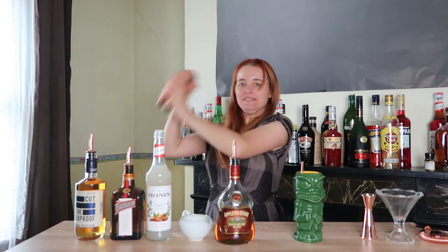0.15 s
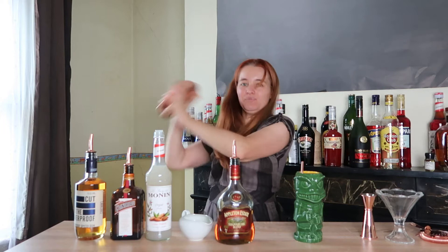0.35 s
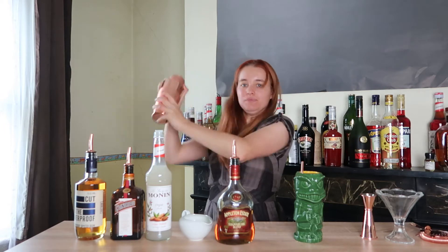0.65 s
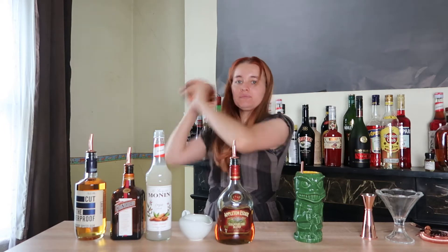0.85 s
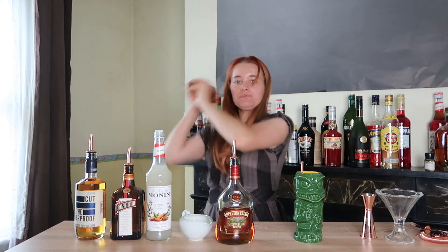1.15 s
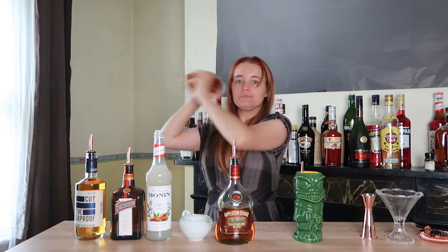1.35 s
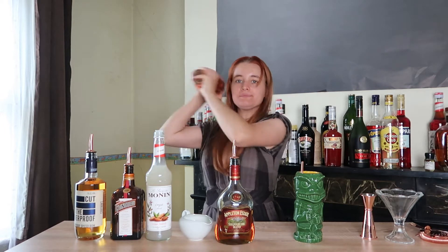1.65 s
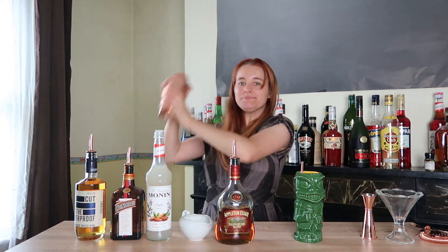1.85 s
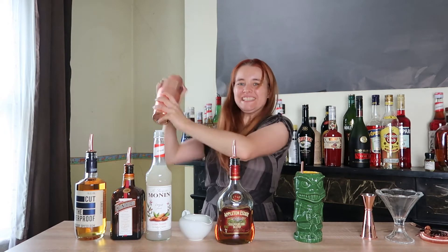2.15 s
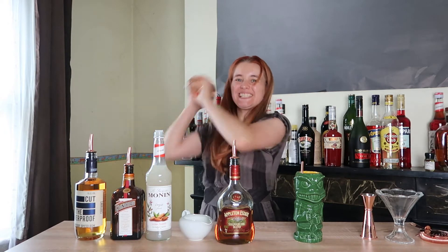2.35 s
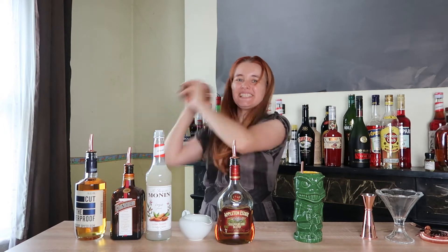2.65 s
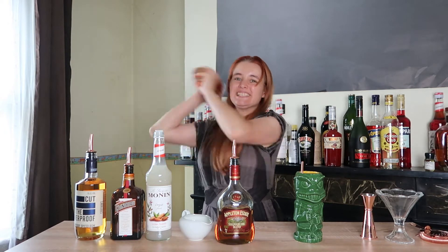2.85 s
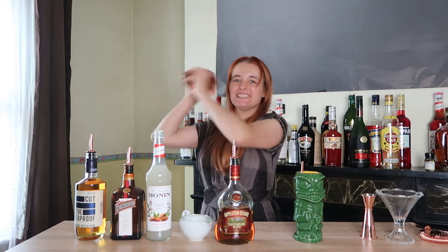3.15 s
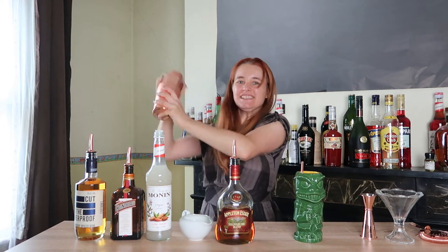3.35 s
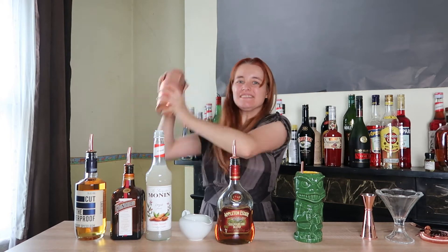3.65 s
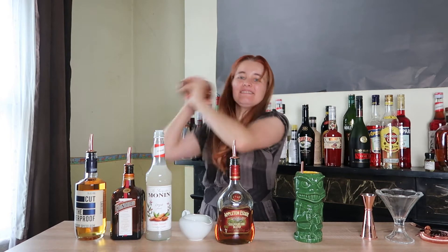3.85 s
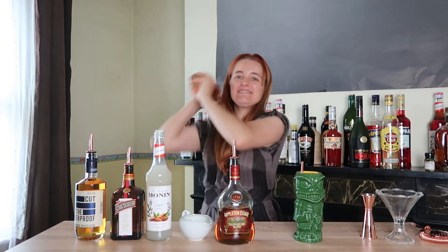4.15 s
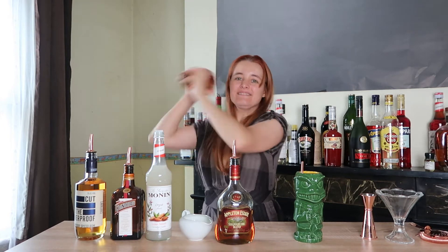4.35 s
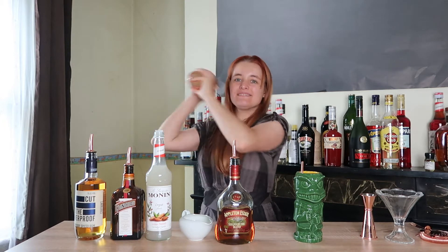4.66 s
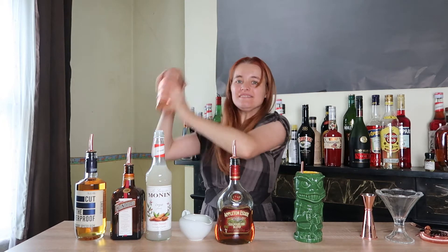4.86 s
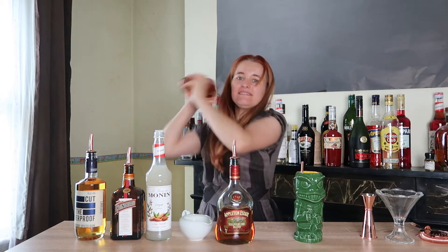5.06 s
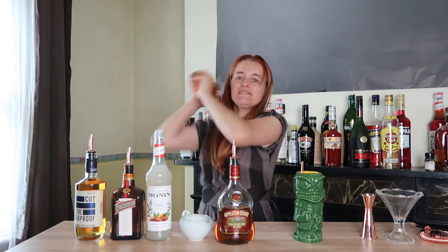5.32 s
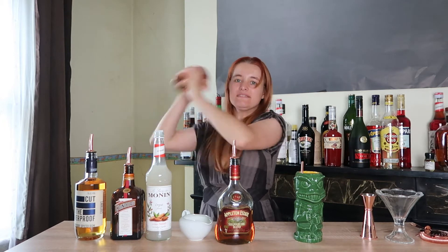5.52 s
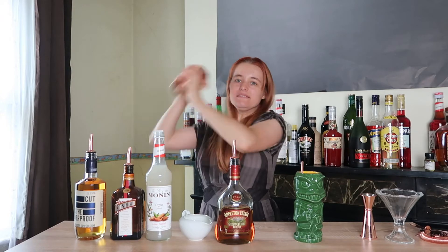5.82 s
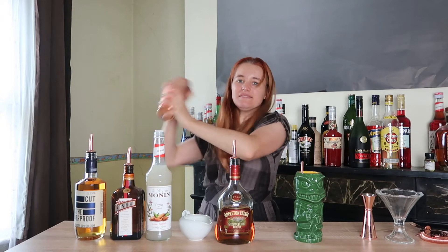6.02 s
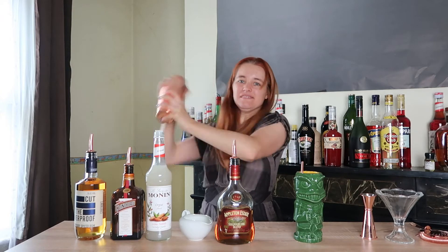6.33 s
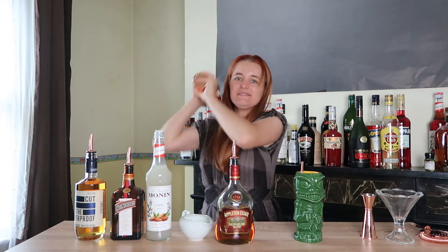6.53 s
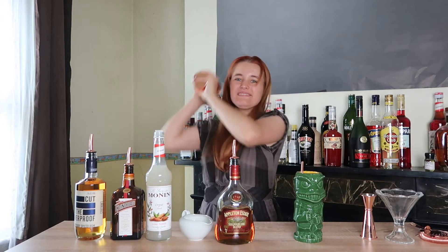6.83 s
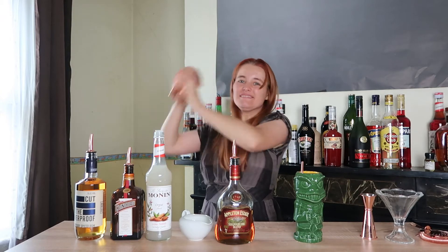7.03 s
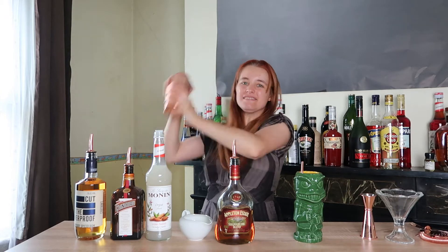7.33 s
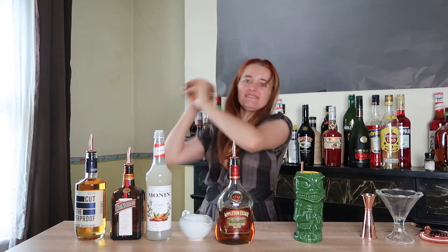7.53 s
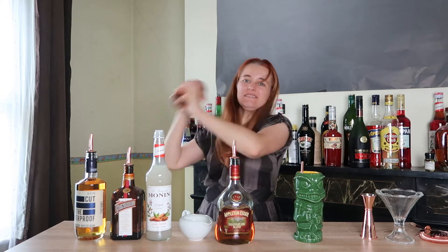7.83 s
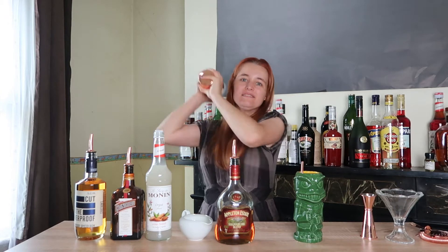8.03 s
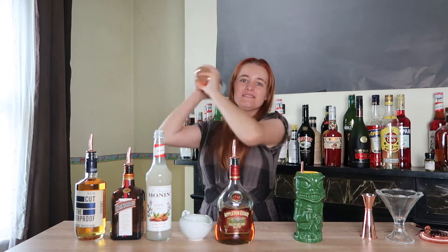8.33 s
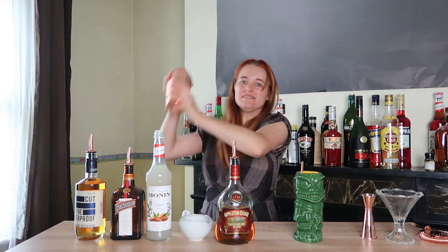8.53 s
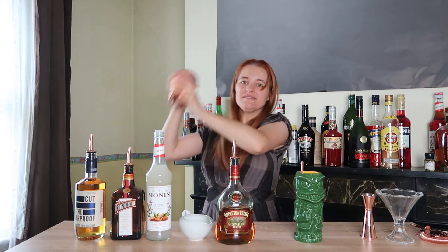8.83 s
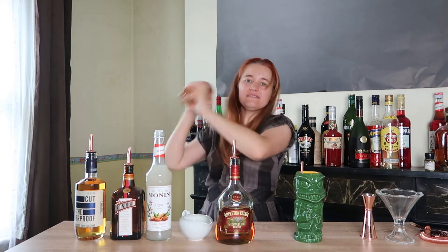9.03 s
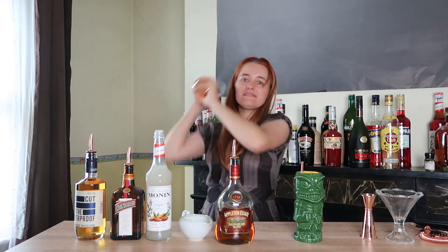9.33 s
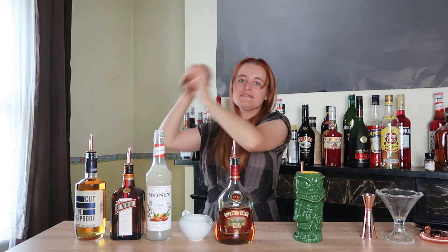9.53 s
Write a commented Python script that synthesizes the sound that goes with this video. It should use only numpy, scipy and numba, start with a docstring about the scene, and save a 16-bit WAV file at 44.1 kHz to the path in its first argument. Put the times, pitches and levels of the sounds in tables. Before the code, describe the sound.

Ice cubes rattle hard and nonstop inside a sealed metal shaker, about three quick strokes a second, in a small furnished room.

```python
"""Ice cubes are thrown up and down inside a sealed steel shaker, about three strokes a second, a few metres away.
Each knock is a sum of short decaying sines of wet, hand-damped steel and a few lasting tones of the tin;
large cubes thud lower, and hard blows crack. A small furnished room answers with decaying noise, over a
faint hum of filtered noise. The microphone pair hears the highest treble mostly in its side signal."""
import sys
import numpy as np
from scipy import signal
from scipy.fft import rfft, irfft
from scipy.io import wavfile
from scipy.ndimage import uniform_filter1d
from numba import njit

SR = 44100
rng = np.random.default_rng(int(sys.argv[2]) if len(sys.argv) > 2 else 0)


def transcribe(u):
    """Save the signal u as a 16-bit wav file named by the first command-line argument.

    u: samples, shape (n,) or (channels, n), limited to [-1, 1]; the rate is SR.
    q: integer samples, one column per channel.
    """
    v = np.clip(np.atleast_2d(u).T, -1, 1)
    q = np.round(v * 32767).astype(np.int16)
    wavfile.write(sys.argv[1], SR, q)


N = 426888
TOP_HZ = 15730  # highest partial, and the top of the recorder's range


def undb(db):
    """Turns decibels into an amplitude factor."""
    return 10 ** (np.asarray(db) / 20)


def level(x, db):
    """Scales a sound to an RMS level in dB."""
    return x * undb(db) / np.sqrt(np.mean(x ** 2))


def colour(x, points):
    """Shapes a sound by a spectrum of (frequency [Hz], gain [dB])."""
    hz, db = np.transpose(points)
    bins = np.arange(len(x) // 2 + 1) * SR / len(x) + 1
    gain = undb(np.interp(np.log(bins), np.log(hz), db))
    return irfft(rfft(x) * gain, len(x))


# spectrum of the hum at the centre of the pair: (frequency [Hz], relative density [dB])
HUM_SPECTRUM = [(25, -10), (49, 4.5), (70, -6), (100, 3.5), (125, -5), (170, 6), (200, -6.5), (238, 5),
                (280, -1.5)]
# loudness of the hum through the take: (time [s], level [dB])
HUM_SWELL_LEVELS = [(0, -54), (4.2, -53), (4.8, -58), (6.7, -54.5), (7.2, -54)]


def hum():
    """Low steady murmur of appliances; the deepest part is the same at both microphones."""
    centre = colour(rng.standard_normal(N), [(10, -40)] + HUM_SPECTRUM + [(3000, -22.5)])
    apart = colour(rng.standard_normal(N), [(20, -30), (130, -13), (250, -4), (600, -8), (3000, -27)])
    swell_db = np.interp(np.arange(N) / SR, *np.transpose(HUM_SWELL_LEVELS))
    return np.array([level(centre, 0), level(apart, -4.0)]) * undb(swell_db)


@njit
def ring(start, hz, t60, size, contact_s, length):
    """Sum of decaying sines, each set off at its own sample and swelling while the contact lasts."""
    swell = np.exp(-1 / (contact_s * SR))
    out = np.zeros(length)
    for k in range(len(start)):
        # turning by this factor each sample gives both pitch and decay
        turn = np.exp(2j * np.pi * hz[k] / SR - np.log(1000.) / (t60[k] * SR))
        z, rest = size[k] + 0j, 1.
        for i in range(start[k], min(length, start[k] + int(.7 * t60[k] * SR))):
            out[i] += z.imag * (1 - rest)
            rest *= swell
            z *= turn
    return out


def partials(s, db, hz, t60, spread_db=3, contact_s=0.0004):
    """Rings for knocks in rows and partials in columns; equal energy whatever the decay, random sign."""
    sign = np.sign(rng.standard_normal(hz.shape))
    size = undb(db + spread_db * rng.uniform(-1, 1, hz.shape)) * sign / np.sqrt(t60)
    sample = np.clip(s[:, None] * SR, 0, N - 1).astype(np.int64)
    start = np.broadcast_to(sample, hz.shape).ravel().copy()
    return ring(start, hz.ravel().copy(), t60.ravel().copy(), size.ravel(), max(contact_s, 1e-5), N)


def steel(s, db, heavy_db, count=10, t60=0.083, contact_s=0.00038):
    """Broad clatter: every knock wakes other partials of the wall; high ones die sooner."""
    place = rng.random((len(s), count))
    hz = 120 + (TOP_HZ - 120) * place ** 1.5
    # partials crowd in the bass, so each is weighted by the room it has
    crowding_db = 5 * np.log10(place + 0.01)
    # big cubes favour the lows
    lows = 1 / (1 + (hz / 1200) ** 4)
    # a harder knock is a shorter contact, so it is brighter; small cubes are brighter than big ones
    treble_db = 0.31 * (db - np.mean(db)) - 0.24 * (heavy_db - np.mean(heavy_db))
    bright_db = treble_db[:, None] / (1 + (6000 / hz) ** 2)
    partial_db = db[:, None] + bright_db + crowding_db + lows * heavy_db[:, None]
    return partials(s, partial_db, hz, t60 * (hz / 2500) ** -.4, contact_s=contact_s)


# lasting tones of the tin: (frequency [Hz], relative level [dB], decay by 60 dB [s])
TIN_TONES = [(770, -13.5, 0.039), (913, -6.5, 0.14), (1879, 4, 0.16), (2086, -4, 0.014), (2306.5, 5.5, 0.2),
             (2806, 6.5, 0.073), (2897, 1.5, 0.23), (3690, 7.5, 0.017), (4060, 6.5, 0.067)]


def tin(s, db):
    """The same few tones of the tin, a little detuned by grip and liquid at each knock."""
    hz, tone_db, t60 = (np.tile(c, (len(s), 1)) for c in np.transpose(TIN_TONES))
    detuned = hz * (1 + 0.0036 * rng.standard_normal(hz.shape))
    return partials(s, db[:, None] + tone_db, detuned, t60, spread_db=6)


def rebounds(s, db, hz, gap_s, fade_db, detune, count):
    """A chattering cube: times, levels and five nearby pitches, kept but slightly bent at each touch."""
    # gap_s is the longest gap between touches; fade_db is lost over that time
    late = np.cumsum(gap_s * rng.random((len(s), count)), axis=1)
    late = late - late[:, :1]
    offset = (np.arange(5) + rng.random((len(s), 5))) / 2.5 - 1
    own = hz[:, None] * (1 + detune * offset)
    bend = 1 + detune * 0.4 * rng.uniform(-1, 1, (len(s) * count, 5))
    near = np.repeat(own, count, axis=0) * bend
    return (s[:, None] + late).ravel(), (db[:, None] - fade_db * late / gap_s).ravel(), near


# the ice lands at one end of the shaker, then the other:
# (time [s], relative rattle level [dB], tumbling lasts [s])
ICE_LANDINGS = [(0.001, -17.5, 0.022), (0.131, -16.5, 0.066), (0.214, -21.5, 0.14), (0.417, -17.5, 0.15),
                (0.564, -23.5, 0.18), (0.703, -16.5, 0.12), (0.865, -21.5, 0.049), (0.983, -19, 0.049),
                (1.094, -23, 0.17), (1.286, -20, 0.22), (1.42, -24, 0.12), (1.573, -19, 0.23),
                (1.723, -23, 0.12), (1.868, -20, 0.25), (2.061, -21, 0.11), (2.182, -20, 0.069),
                (2.301, -20.0, 0.13), (2.487, -17.5, 0.12), (2.637, -17.5, 0.056), (2.787, -16, 0.16),
                (2.952, -19.5, 0.027), (3.05, -19.5, 0.24), (3.234, -20, 0.09), (3.366, -17.5, 0.13),
                (3.555, -19.5, 0.016), (3.684, -20, 0.059), (3.759, -18.5, 0.14), (3.982, -18.0, 0.19),
                (4.157, -25.5, 0.06), (4.274, -20, 0.14), (4.37, -23, 0.14), (4.576, -18.5, 0.078),
                (4.615, -21.5, 0.18), (4.833, -21, 0.17), (5.019, -22.5, 0.092), (5.177, -19, 0.11),
                (5.212, -23, 0.2), (5.502, -19, 0.15), (5.666, -25.5, 0.08), (5.778, -20.5, 0.16),
                (5.866, -26.5, 0.24), (6.099, -18.5, 0.086), (6.21, -21.5, 0.19), (6.405, -16.5, 0.1),
                (6.563, -23.5, 0.058), (6.711, -20, 0.099), (6.845, -22, 0.11), (7.04, -17.5, 0.13),
                (7.214, -20.5, 0.065), (7.348, -18.5, 0.11), (7.502, -20, 0.076), (7.644, -18.5, 0.066),
                (7.726, -21, 0.13), (7.941, -19.5, 0.054), (8.013, -19.5, 0.13), (8.21, -19.5, 0.18),
                (8.342, -25.5, 0.17), (8.562, -20, 0.14), (8.714, -20, 0.045), (8.861, -18, 0.13),
                (9.02, -19.5, 0.081), (9.155, -19.5, 0.17), (9.342, -24, 0.096), (9.48, -21.5, 0.084),
                (9.537, -23.5, 0.14), (9.666, -20.5, 0.02)]
RISE_DB_PER_S, SAG_DB_PER_S, FALL_DB_PER_S = 642, 24.5, 264  # before landing, tumbling, flying free
# the big cubes arrive first, then give way to small ones
HEAVY_DB, HEAVY_FADE_DB_PER_S, HEAVY_LEAD_S = 7.5, 54, 0.028


def shaking(s):
    """Rattle level and weight of the big cubes at times s: each landing rises fast, sags, then falls away."""
    at, db, tumble = (c[:, None] for c in np.transpose(ICE_LANDINGS))
    age = s - at
    rise = RISE_DB_PER_S * np.minimum(age, 0)
    sag = SAG_DB_PER_S * np.clip(age, 0, tumble)
    fall = FALL_DB_PER_S * np.maximum(age - tumble, 0)
    effort_db = 10 * np.log10(np.sum(undb(db + rise - sag - fall) ** 2, axis=0))
    # time since the big cubes of the latest landing arrived
    since = np.min(np.where(age > -HEAVY_LEAD_S, age + HEAVY_LEAD_S, 1), axis=0)
    return effort_db, HEAVY_DB - HEAVY_FADE_DB_PER_S * since


# colour of the ice on steel in the sum of the two microphones: (frequency [Hz], relative gain [dB])
SUM_COLOUR = [(150, -38), (300, -31.5), (520, -25), (920, -18.5), (1900, -8), (2800, -8.5), (4100, -10),
              (6050, -13.5), (12600, -29.5), (15500, -50)]
# the same in their difference: (frequency [Hz], relative gain [dB])
DIFFERENCE_COLOUR = [(150, -51), (300, -45), (600, -40.5), (1500, -35), (2300, -23.5), (4000, -17.5),
                     (11600, -23), (14300, -33), (15500, -39)]
KNOCKS_PER_S = 900


def rattle():
    """The crowd of small knocks: uneven times, most soft, some harder; one in ten is a clack with its own pitch."""
    chance = rng.random((int(KNOCKS_PER_S * N / SR), 3))  # time, strength, pitch
    s = chance[:, 0] * N / SR
    effort_db, heavy_db = shaking(s)
    # the mix of big and small cubes changes from clump to clump, every 1500 samples
    clump_db = 2.5 * rng.standard_normal(N // 1500 + 1)
    heavy_db = heavy_db + clump_db[(s * SR).astype(int) // 1500]
    db = effort_db - 1.69 * np.log(chance[:, 1] + 0.031)
    front = colour(steel(s, db, heavy_db), SUM_COLOUR)
    wide = colour(steel(s, db, heavy_db), DIFFERENCE_COLOUR)
    clack_hz = 1100 * 6.5 ** chance[::10, 2]
    again, softer, near = rebounds(s[::10], db[::10], clack_hz, .006, 0.53, 0.091, count=4)
    clacks = colour(partials(again, softer[:, None], near, 0.056 + 0 * near), SUM_COLOUR)
    front = front + undb(-1.5) * clacks + undb(-11.5) * tin(s[::25], db[::25])
    return undb(-15) * np.array([front, undb(1.6) * wide])


# hardest blows of a cube on the steel: (time [s], relative level [dB], centre of its partials [Hz])
HARD_BLOWS = [(0.1022, -8.5, 6670), (0.2025, -0.5, 3800), (0.2428, -4, 3520), (0.399, -9.5, 3770),
              (0.629, -8, 3670), (0.7016, -12, 2230), (0.716, -8, 2980), (0.8611, -9, 2320),
              (1.0016, -6, 2240), (1.0208, 1.5, 2660), (1.3892, -6, 2580), (1.477, -7, 3470),
              (1.572, -18, 2500), (1.719, -5.5, 2670), (1.7365, -2, 2760), (1.854, -5, 2160),
              (1.963, -1.5, 3390), (2.0428, -3.5, 2330), (2.3161, -4, 1870), (2.3775, -4, 2780),
              (2.484, -12, 2610), (2.586, -9, 3280), (2.7744, -12, 1880), (2.931, -1.5, 3390),
              (3.0433, -9, 1980), (3.057, -7, 2850), (3.1497, -4.5, 2640), (3.1763, -3, 2790),
              (3.262, -7, 4040), (3.3725, -9, 2940), (3.4584, -1, 1840), (3.5843, -1.5, 4000),
              (3.788, 0, 2290), (3.9923, -12, 3970), (4.0724, 1, 2810), (4.1559, -10, 2430),
              (4.3525, 1.5, 1970), (4.393, -16, 3920), (4.5782, -8.5, 2280), (4.666, 3, 3700),
              (4.998, -3, 2870), (5.213, -1.5, 2670), (5.2794, 1, 2296), (5.517, -2, 2340),
              (5.611, -8, 2340), (5.655, -6, 3800), (5.8869, -0.5, 2550), (6.1364, -2, 2910),
              (6.3961, -10, 1820), (6.463, -0.5, 3890), (6.7356, -2, 4080), (6.8867, -8, 4140),
              (7.0206, -4.5, 2320), (7.118, -5, 1720), (7.199, -1.5, 2090), (7.3803, -0.5, 2860),
              (7.640, -13, 1810), (7.7394, 0.5, 2770), (7.7588, 0.5, 4090), (7.942, -5, 2280),
              (7.9775, -1.5, 3350), (8.0347, -4, 2560), (8.192, -3.5, 2220), (8.2574, -7, 2300),
              (8.3197, -0.5, 3360), (8.3714, -1.5, 2090), (8.5515, -9.5, 2890), (8.604, -2, 2960),
              (8.6428, -7, 4820), (8.841, -3.5, 2800), (8.8905, -2.5, 3480), (9.1463, -11, 2290),
              (9.2494, -4.5, 2660), (9.3263, -4.5, 2440), (9.4934, -7.5, 2330)]


def blows():
    """Each hard blow: a broad crack, a cluster of partials at its own pitch, and the tin."""
    s, db, hz = np.transpose(HARD_BLOWS)
    again, softer, near = rebounds(s, db, hz, 0.005, 4.6, 0.1203, count=5)
    light_db = 0 * again - 10
    front, wide = (colour(steel(again, softer, light_db, count=60, t60=0.088, contact_s=0.0019), c)
                   for c in (SUM_COLOUR, DIFFERENCE_COLOUR))
    # the first instant of each touch is a dry snap
    snap = colour(steel(again, softer, 0 * again - 9, count=30, t60=0.011), SUM_COLOUR)
    knock = undb(3.0) * snap + partials(again, softer[:, None], near, 0.056 + 0 * near)
    front = undb(-0.5) * front + undb(-7.0) * knock + undb(-14.0) * tin(s, db)
    return undb(-27.5) * np.array([front, wide])


# low thuds of the biggest cubes: (time [s], relative level [dB], centre of its partials [Hz])
BIG_CUBE_THUDS = [(0.136, -19.5, 1090), (0.293, -21, 815), (0.431, -19.5, 900), (0.556, -26, 726),
                  (0.688, -27, 960), (0.986, -22.5, 1030), (1.278, -23, 995), (1.581, -23.5, 893),
                  (1.859, -21, 1046), (2.171, -15.5, 1124), (2.22, -21.5, 960), (2.496, -26, 1040),
                  (2.647, -27, 1040), (2.79, -20.5, 1010), (2.864, -27.5, 920), (3.564, -30, 593),
                  (3.706, -21.5, 965), (3.984, -33, 362), (4.162, -21.5, 926), (4.272, -19.5, 1063),
                  (4.273, -29, 376), (4.296, -18.5, 947), (4.438, -26, 540), (4.583, -18.5, 987),
                  (4.893, -32, 386), (5.055, -32, 470), (5.503, -30, 950), (5.829, -45, 930),
                  (6.106, -18.5, 554), (6.219, -21, 1120), (6.375, -23, 1040), (6.71, -31.5, 810),
                  (7.335, -22, 1180), (7.529, -18.5, 1000), (7.639, -17.5, 984), (7.939, -22, 940),
                  (8.55, -14, 1384), (8.55, -31, 380), (8.708, -39, 1100), (8.84, -22, 1200),
                  (9.019, -23, 1860), (9.146, -22, 1070), (9.35, -20.5, 1345), (9.5, -19, 1030)]


def thuds():
    """Big cubes landing on the ends: hollow, rough and short, over a wide-band dull clatter."""
    again, softer, near = rebounds(*np.transpose(BIG_CUBE_THUDS), 0.0097, 2.3, 0.13, count=6)
    t60 = 0.044 * (1000 / near) ** 0.49
    hollow = partials(again, softer[:, None], near, t60, contact_s=0.00063)
    clatter = colour(steel(again, softer, 0 * again + 14, count=30), SUM_COLOUR)
    return undb(-21.5) * colour(hollow + undb(8.0) * clatter, [(150, -12), (450, 0.0), (3000, -2.5)])


# knocks that wake the tin's main tone clearly: (time [s], rings for [s], relative level [dB])
TIN_RINGS = [(0.563, 0.039, -29), (0.696, 0.028, -27), (0.856, 0.065, -21.5), (0.988, 0.062, -20),
             (1.85, 0.072, -16.5), (2.033, 0.051, -22), (2.161, 0.028, -21), (2.201, 0.04, -22),
             (2.812, 0.027, -20), (2.867, 0.044, -34), (3.051, 0.1, -18.5), (3.362, 0.092, -19),
             (3.792, 0.07, -24), (3.999, 0.034, -24), (4.274, 0.03, -18), (4.432, 0.033, -19.5),
             (4.58, 0.031, -22), (4.715, 0.057, -21), (5.021, 0.064, -19.5), (5.21, 0.048, -31),
             (7.022, 0.058, -28), (7.208, 0.068, -19), (7.511, 0.027, -17), (7.804, 0.033, -19),
             (8.395, 0.036, -20), (8.712, 0.044, -24), (9.143, 0.032, -17), (9.329, 0.045, -18.5),
             (9.49, 0.079, -20)]


def rings(count=3):
    """The tin's main tone and upper neighbours, struck afresh several times as a cube skids along the wall."""
    s, lasts, db = (np.repeat(c, count) for c in np.transpose(TIN_RINGS))
    late = (np.tile(np.arange(count), len(TIN_RINGS)) + rng.random(len(s))) / count  # 0 to 1 of the skid
    tones = np.array([TIN_TONES[4][0], TIN_TONES[6][0], TIN_TONES[8][0]])
    hz = tones * (1 + .003 * rng.uniform(-1, 1, (len(s), 3)))
    strike_db = db + 10 * np.log10(lasts) - 4.6 * late
    tone_db = strike_db[:, None] + np.array([4.5, -5.0, -9.0])
    return partials(s + 0.83 * late * lasts, tone_db, hz, 0.068 + 0 * hz, spread_db=2)


def room(x, t60=0.5, treble_t60=0.53, wet_db=-6, gap_s=.006):
    """Direct sound plus a decaying haze of reflections, which start after gap_s."""
    # the shaker moves, so each tenth of a second finds other paths
    hop, t = SR // 10, np.arange(SR // 2) / SR
    out, fade = np.zeros(N + SR), np.hanning(2 * hop + 1)[:-1]
    padded = np.pad(x, (hop, 2 * hop))
    for start in range(0, N + hop, hop):
        noise = rng.standard_normal(len(t))
        dull = uniform_filter1d(noise, size=5)
        treble = noise - dull
        tail = dull * 1000. ** (-t / t60) + treble * 1000. ** (-t / treble_t60)
        tail = tail * (t > gap_s)
        piece = padded[start:start + 2 * hop] * np.sqrt(fade)
        wet = signal.fftconvolve(piece, tail / np.sqrt(np.sum(tail ** 2)))
        out[start:start + len(wet)] += wet
    # furnishings and thin walls let the low middle escape
    haze = colour(out[hop:hop + N], [(300, -1.2), (800, 0.25), (1600, 0.63), (6000, 0.92)])
    return x + undb(wet_db) * haze


def scene():
    """The shaker in its room over the hum, as sum and difference turned into left and right."""
    front, wide = rattle() + blows()
    # the knocks, thuds and tin tones carry no bass below about 220 Hz
    no_bass = signal.butter(2, 220, "high", fs=SR, output="sos")
    front = signal.sosfilt(no_bass, front + thuds() + rings())
    mid, side = np.array([room(front), room(wide, wet_db=-2.5)]) + hum()
    return np.array([mid + side, mid - side])


def record(dry):
    """The recorder rounds the loudest peaks and cuts the top."""
    rounded = np.tanh(dry / 1.345) * 1.448
    return signal.sosfilt(signal.ellip(10, .2, 80, TOP_HZ, fs=SR, output="sos"), rounded)


dry = scene()
out = record(dry)
transcribe(out)
```